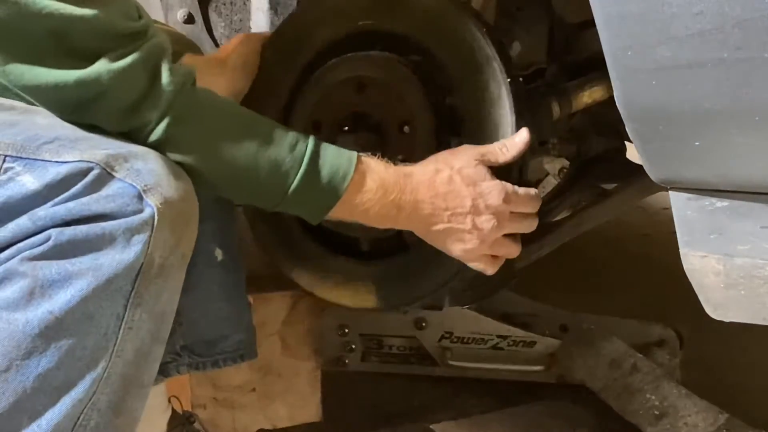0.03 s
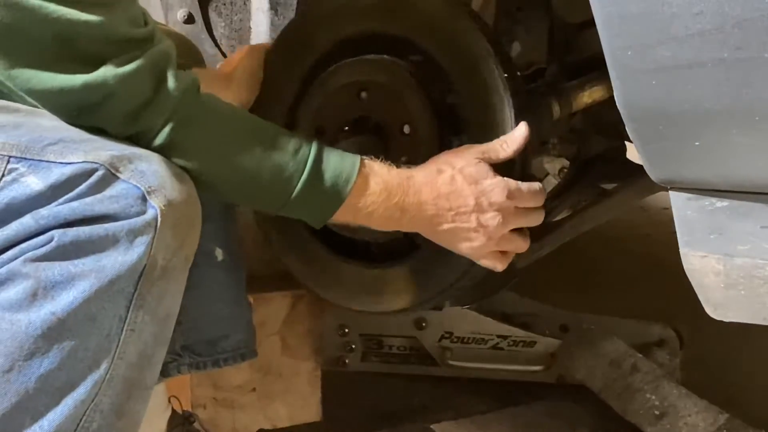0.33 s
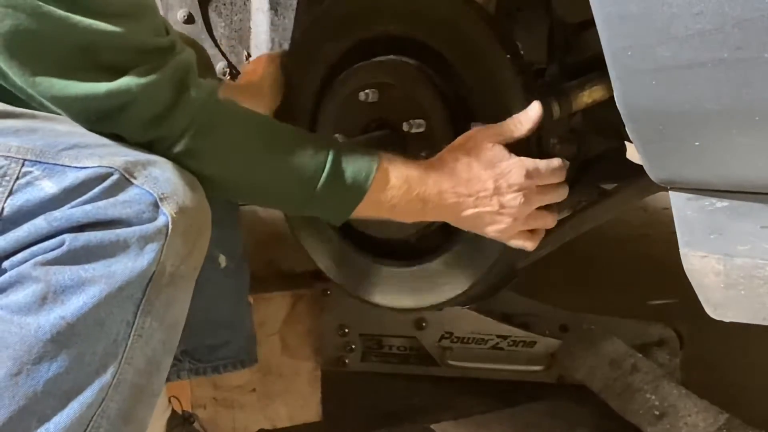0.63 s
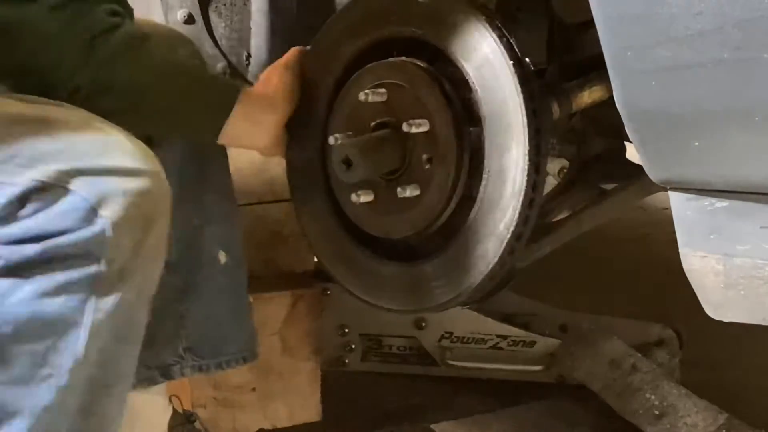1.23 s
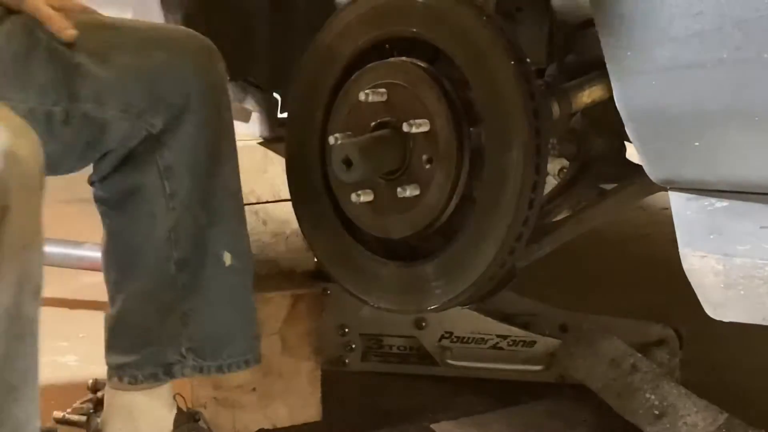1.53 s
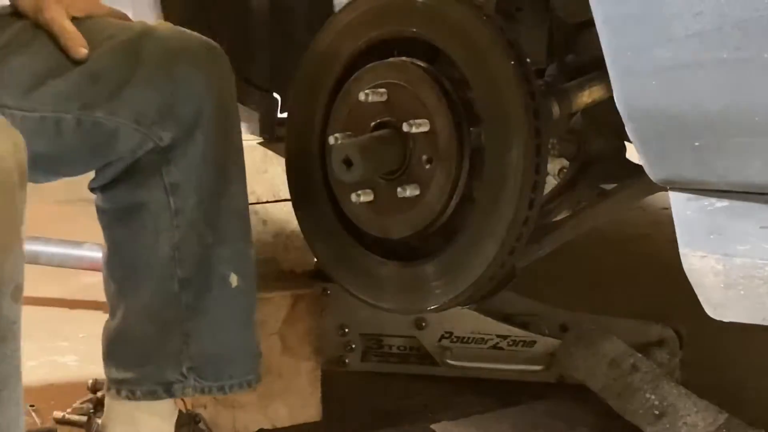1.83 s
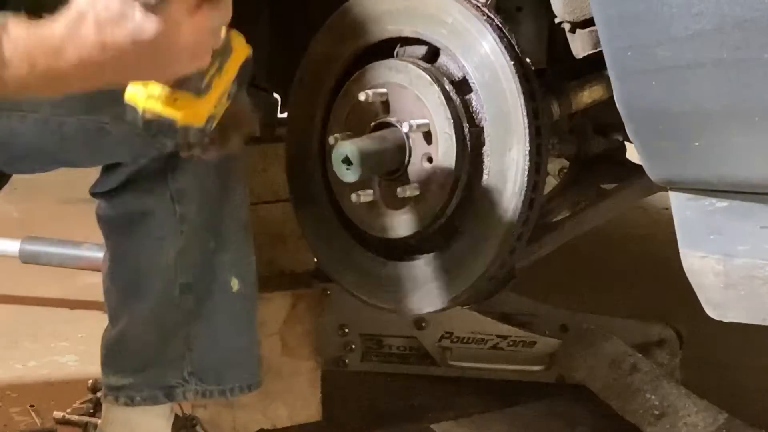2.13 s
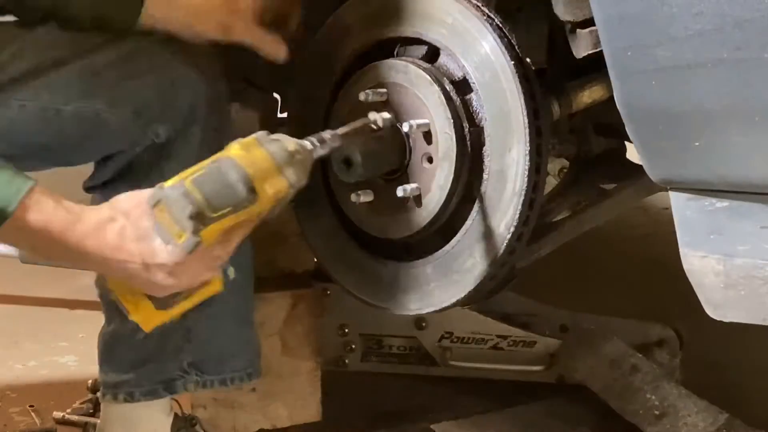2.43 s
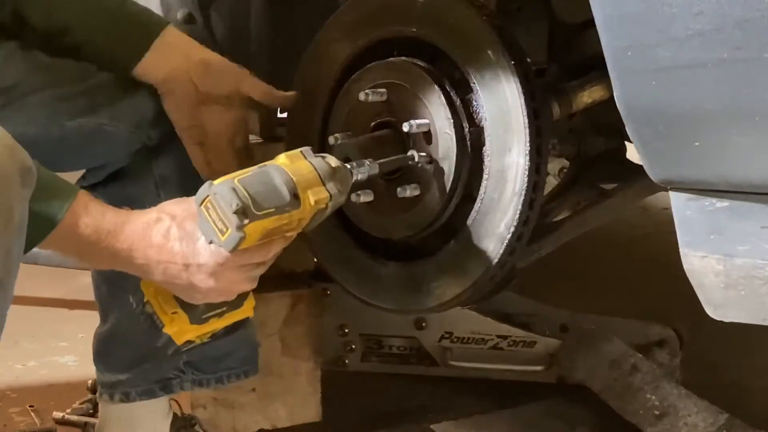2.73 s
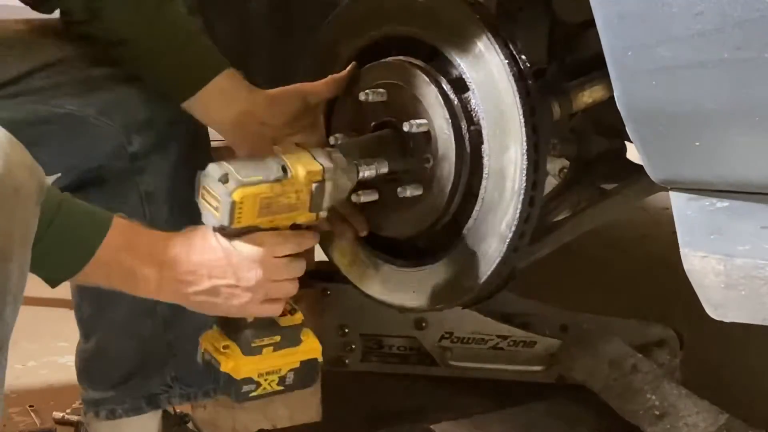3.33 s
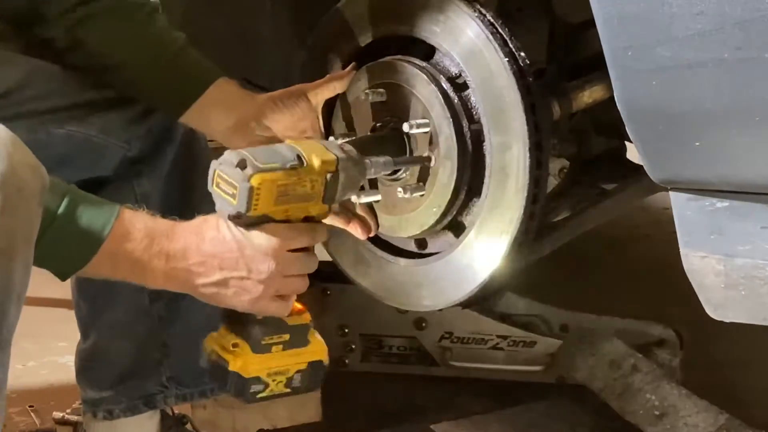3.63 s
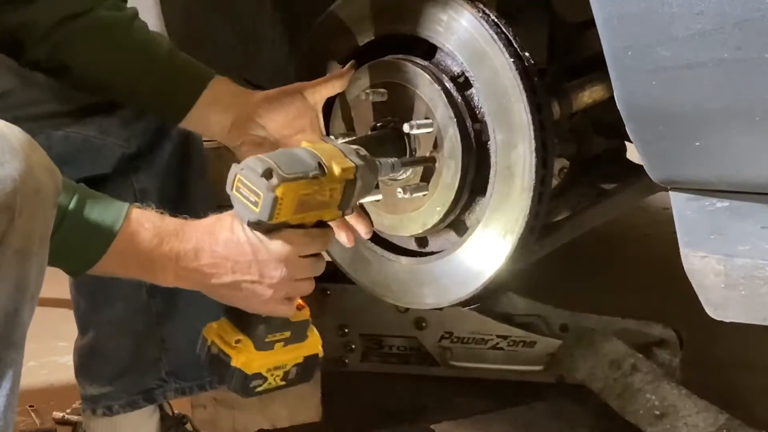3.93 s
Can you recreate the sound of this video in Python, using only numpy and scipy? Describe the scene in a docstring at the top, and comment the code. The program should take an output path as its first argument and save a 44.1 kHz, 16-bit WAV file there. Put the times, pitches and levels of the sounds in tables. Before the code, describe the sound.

Close up in a garage, a hand-turned brake disc scrapes with dull knocks. After a lull of faint cloth rustle and electrical hum, a steel socket clanks on and a cordless impact tool whirs briefly three times.

```python
"""A brake disc scrapes, rings and clacks as it is turned by hand, and the slack in the drive shaft clunks.
We are in a garage, with a stereo microphone close to the wheel arch. Clothes rustle, a socket clanks
onto the hub nut, and a cordless impact tool spins up in three short blips that knock the shaft round
again. A mains hum lies underneath, and the room adds a short tail."""
import sys
import numpy as np
from scipy import signal
from scipy.fft import rfft, irfft
from scipy.io import wavfile

SR = 44100
rng = np.random.default_rng(int(sys.argv[2]) if len(sys.argv) > 2 else 0)


def materialize(psi):
    """Save the field psi as 16-bit PCM at rate SR to the path in sys.argv[1].

    A 1-D psi becomes a single channel; in a 2-D psi each row is a channel.
    """
    bounded = np.clip(np.atleast_2d(psi).T, -1, 1)
    quanta = np.round(bounded * 32767).astype(np.int16)
    wavfile.write(sys.argv[1], SR, quanta)


N = 176400
T = np.arange(N) / SR

# Modes of the brake disc. Each row: frequency in Hz, relative level in dB, t60 in seconds.
DISC_MODES = [(1248.4, 1, 0.16), (1985, -7.5, 0.08), (2143, -10.5, 0.1), (2500, -7.5, 0.035),
              (3003, 8.5, 0.054), (3575, -7, 0.078), (3762, -2, 0.052), (4750, -3, 0.08),
              (6060, -1.5, 0.11), (7710, -7.5, 0.24), (10030, -18.5, 0.15), (11400, -14.5, 0.04),
              (12600, -5.5, 0.035)]
# Spectrum of rubbing cloth. Each row, as in every spectrum here: frequency in Hz, relative level in dB.
CLOTH_SPECTRUM = [(40, -37), (150, -2), (500, -4), (1600, 0.5), (3500, -0.5), (5500, -9.5), (8500, -5.5),
                  (14000, -22)]


def disc_scrapes():
    """The disc catches: a chattering rub rings it, most of all near the pitch of the contact."""
    # Each row: start in seconds, level in dB, decay in seconds, tilt in dB per octave, contact in Hz.
    catches = [(0.001, -45, 0.027, -2, 3000), (0.04, -44, 0.0086, 3, 3000),
               (0.108, -55.5, 0.031, 2.5, 5900), (0.122, -46, 0.01, 2, 3040),
               (0.301, -57.5, 0.024, 2, 3040), (0.384, -49, 0.032, 8, 1280), (0.422, -60, 0.038, -1, 1260),
               (0.498, -49.5, 0.0064, 2, 2100), (0.518, -50, 0.016, 0, 3760),
               (0.553, -42.5, 0.052, 4.5, 4700), (0.612, -46.5, 0.048, 6, 3750),
               (0.656, -28, 0.016, -2.5, 2200), (0.708, -35, 0.019, -0.5, 3760),
               (0.748, -44, 0.0067, -4, 2980), (0.938, -40, 0.017, -0.5, 6000)]
    # Spectrum of the grinding. Each row: Hz, dB.
    grind_spectrum = [(200, -80), (800, -9.5), (2000, -6), (4300, -8.5), (6500, -5.5), (8300, -6),
                      (10800, -19.5), (12200, -8.5), (15500, -43.5)]
    contact_db, contact_octaves = 9, .15

    def scrape(t, decay_s, tilt_db, contact_hz):
        envelope = swell(t, rise_s=decay_s / 10, decay_s=decay_s)
        rub = unit(rng.standard_normal(len(t)) * (.5 + chatter(len(t))))
        modes = [(hz, db + contact_db * np.exp(-(np.log2(hz / contact_hz) / contact_octaves) ** 2), t60)
                 for hz, db, t60 in DISC_MODES]
        ringing = excite(envelope * rub, ring(modes, t, tilt_db))
        grind = envelope * unit(shape(resound(rub, ring_s=.0025), grind_spectrum, tilt_db))
        return amp(-6) * grind + amp(2) * ringing
    return play(catches, scrape)


def disc_clacks():
    """Loose metal knocks home: a hard midrange crack and a little ring from the disc."""
    # Each row: start in seconds, level in dB, decay in seconds.
    knocks = [(0.017, -43.5, 0.0079), (0.9213, -25, 0.0087), (1.2015, -42, 0.0033), (1.2325, -34, 0.0028),
              (1.24, -44, 0.0082), (2.008, -51, 0.0045), (3.2372, -38.5, 0.01), (3.4118, -42, 0.024)]
    # Spectrum of the crack. Each row: Hz, dB.
    crack_spectrum = [(600, -32), (1200, -5.5), (3200, -1.5), (4800, -14.5), (7000, -22.5), (15000, -33.5)]

    def clack(t, decay_s):
        crack = unit(shape(rng.standard_normal(len(t)), crack_spectrum))
        crack *= swell(t, rise_s=.00013, decay_s=decay_s)
        return crack + amp(-5) * excite(crack, ring(DISC_MODES, t))
    return play(knocks, clack)


def shaft_clunks():
    """The slack is taken up with a dull knock; the car body and room boom and ring just after it."""
    # Each row: start in seconds, level in dB, tilt in dB per octave (also favours knock over boom).
    knocks = [(0.001, -42, -3), (0.041, -29.5, -3), (0.122, -36.5, -3), (0.325, -48.5, -10.5),
              (0.392, -37.5, -1.5), (0.422, -38.5, -2), (0.51, -42.5, -3), (0.556, -40.5, -0.5),
              (0.602, -34.5, -2), (0.712, -23.5, 0.5), (0.738, -50, 11.5), (0.945, -38.5, 3.5),
              (1.24, -51, 0), (3.035, -43, -3), (3.092, -35.5, -0.5), (3.18, -45, -4.5), (3.445, -41, -2.5),
              (3.616, -29, 0), (3.64, -35, -3.5), (3.781, -28.5, 2.5)]
    # Low ringing of the car body and room after each clunk. Each row: Hz, dB, t60 in seconds.
    body_modes = [(116, 1, .35), (166, 3, .35), (213, 10, .38), (323, 10, .42), (381, 7, .25),
                  (441, 8.5, .22), (624, 13, .14), (1263, 7, .2)]
    # Spectra of the knock and the boom. Each row: Hz, dB.
    knock_spectrum = [(30, -54), (100, -21), (250, -6.5), (400, -3.5), (700, 1), (1000, -10.5), (1400, -18),
                      (2500, -22.5), (6000, -40)]
    boom_spectrum = [(40, -51), (55, -21), (75, -17.5), (110, -2.5), (210, 0), (300, -5.5), (500, -13),
                     (1500, -86.5)]

    def clunk(t, tilt_db):
        knock = grit(len(t), knock_spectrum, rough_db=-2.5) * swell(t, rise_s=.0018, decay_s=.029)
        boom = grit(len(t), boom_spectrum, rough_db=.5) * swell(t, rise_s=.024, decay_s=.044)
        ringing = ring(body_modes, t, tilt_db) * (1 - np.exp(-t / .024))
        return amp(-4.5 + tilt_db) * knock + amp(-7 - tilt_db) * boom + amp(2.5) * ringing
    return play(knocks, clunk)


def socket_clanks():
    """Steel strikes the hub: a hard crack and the short ring of the socket."""
    # Each row: start in seconds, level in dB, decay in seconds, tilt in dB per octave, ring in dB.
    strikes = [(3.024, -49, 0.041, -2, -4), (3.042, -43, 0.055, -2.5, -1.5), (3.0785, -28.5, 0.011, -2, -1),
               (3.0955, -28, 0.005, -1.5, 7.5), (3.1845, -47, 0.0075, -7, -9),
               (3.2741, -43.5, 0.0036, -1.5, -1), (3.369, -54.5, 0.071, -13, -22),
               (3.4208, -43, 0.03, 2, -12), (3.4392, -17, 0.0085, -1.5, -23), (3.4428, -24.5, .007, 9, -9),
               (3.4578, -12.5, 0.0028, 8.5, -27), (3.462, -29.5, 0.01, -2.5, -18),
               (3.472, -39.5, 0.089, 7, -27)]
    # Modes of the socket. Each row: Hz, dB, t60 in seconds.
    socket_modes = [(1238, -4, .12), (2320, -1, .08), (3015, 2, .04), (3700, -2, .025), (4398, -3, .025),
                    (5378, 3, .055), (7041, -6, .04)]
    # Spectrum of the crack. Each row: Hz, dB.
    crack_spectrum = [(150, -26), (600, -18.5), (950, -14.5), (1400, -5), (2100, -5.5), (3400, 4),
                      (6000, 0.5), (8000, 1), (10500, -7), (14000, -7.5), (16000, -19)]

    def clank(t, decay_s, tilt_db, ring_db):
        crack = grit(len(t), crack_spectrum, rough_db=1, tilt_db=tilt_db)
        crack *= swell(t, rise_s=.00062, decay_s=decay_s)
        ringing = ring(socket_modes, t, tilt_db / 2) * (1 - np.exp(-t / .00017))
        return crack + amp(ring_db) * ringing
    return play(strikes, clank)


def impact_tool():
    """Each pull spins the motor up until the brake stops it: gears rattle and whine, metal rings on."""
    # Each row: start and length in seconds, target turns per second, relative dB of gears, whine, ring.
    pulls = [(3.586, .04, 445, -28.5, -41, -37), (3.701, .07, 390, -31.5, -39, -38),
             (3.909, .04, 255, -34, -47, -40)]
    # Whine of motor and gears. Each row: multiple of the shaft speed, level in dB.
    whine_partials = [(5, -11), (8, -9), (11, -12), (14, -6), (20, 0), (22, -8)]
    # Modes of the tool's metal. Each row: Hz, dB, t60 in seconds.
    tool_modes = [(4450, -10, .04), (5375, -7, .06), (7300, -2, .09), (7470, -1, .15), (7615, -1, .28),
                  (7760, 0, .12)]
    # Spectra of the gear noise and the housing's resonances. Each row: Hz, dB.
    gear_spectrum = [(900, -14.5), (1700, -2), (3300, 2.5), (4800, 2.5), (6500, -2.5), (7900, 3.5),
                     (9500, 0.5), (11200, -9), (14300, -1), (16000, -17)]
    housing_spectrum = [(1500, -6), (3050, 0), (3900, -5), (5350, 0), (6800, -8), (7400, 10), (7750, 13),
                        (8200, -2)]
    spin_up_s, brake_s, gear_rise_s, gear_fall_s, housing_ring_s = .017, .036, .014, .016, .0016
    coast_db = -7  # the rattle eases as the motor reaches speed
    shaft_hz, load, whine_level, jolt = np.zeros((4, N))
    for start, length, top_hz, gear_db, whine_db, ring_db in pulls:
        since_pull, since_release = np.maximum(T - start, 0), np.maximum(T - start - length, 0)
        speed = (1 - np.exp(-since_pull / spin_up_s)) * np.maximum(1 - (since_release / brake_s) ** 2, 0)
        fade = np.exp(-since_release / gear_fall_s)
        driven = (1 - np.exp(-(since_pull / gear_rise_s) ** 2)) * fade
        shaft_hz += top_hz * speed
        load += amp(gear_db + coast_db * speed ** 2) * driven
        whine_level += amp(whine_db) * speed * driven
        jolt += amp(ring_db + coast_db * speed) * (since_pull > 0) * fade
    angle = phase(shaft_hz * (1 + .007 * walk(400)))
    teeth = amp(-2) * gear_mesh(angle) * np.sqrt(shaft_hz / shaft_hz.max())
    rasp = amp(-3) * rng.standard_normal(N)
    force = load * (teeth + rasp) * unit(.5 + chatter(N))
    gears = unit(shape(resound(force, housing_ring_s), gear_spectrum)) * np.std(force)
    tones = whine_level * sum(amp(db + 2 * walk(300)) * np.sin(k * angle) for k, db in whine_partials)
    # The whine flares as it sweeps through the housing's resonances.
    whine = shape(tones + resound(tones, housing_ring_s), housing_spectrum)
    ringing = excite(jolt * rng.standard_normal(N), ring(tool_modes, T[:SR]))
    return gears + whine + ringing


def gear_mesh(angle, count=38):
    """Gear teeth give the same rough pattern on every turn of the shaft."""
    return sum(np.sin(k * angle + 2 * np.pi * rng.random()) for k in range(1, count)) / np.sqrt(count / 2)


def handling_ticks():
    """Handling makes short dry scuffs."""
    # Each row: start in seconds, level in dB, decay in seconds, tilt in dB per octave.
    scuffs = [(1.134, -53, 0.04, 1), (1.222, -44, 0.023, -3.5), (1.632, -55.5, 0.0028, 12.5),
              (1.8686, -52.5, 0.0046, 16.5), (2.0065, -52.5, 0.014, 6.5), (2.028, -49.5, 0.021, -4.5),
              (2.285, -53.5, 0.016, 5), (2.311, -58, 0.0067, 2.5), (2.648, -64.5, 0.026, 1)]

    def tick(t, decay_s, tilt_db):
        scuff = grit(len(t), CLOTH_SPECTRUM, rough_db=3, tilt_db=tilt_db)
        return scuff * swell(t, rise_s=.0035, decay_s=decay_s)
    return play(scuffs, tick)


def clothes():
    """Cloth rubs near the microphone with a wandering brightness; one sleeve gives a falling swish."""
    # Sliding cloth. Each row: time in seconds, dull rub in dB, bright hiss in dB.
    rustle = [(0.9, -55.5, -142), (0.98, -58.5, -58.5), (1.11, -71, -79), (1.17, -52.5, -51.5),
              (1.22, -51, -64), (1.27, -51.5, -74), (1.39, -71.5, -77), (1.5, -66.5, -65),
              (1.59, -78.5, -75.5), (1.69, -73, -55.5), (1.77, -84, -84), (1.86, -78.5, -81),
              (1.9, -68, -63), (2.06, -64.5, -72), (2.24, -69.5, -70), (2.3, -61, -65), (2.36, -84, -83),
              (2.39, -65, -60.5), (2.5, -77, -105), (2.92, -83, -78.5), (3.1, -56.5, -68), (3.21, -54, -60),
              (3.34, -64, -91)]
    # The passing sleeve. Each row: time in seconds, level in dB, centre in Hz.
    sleeve = [(1.87, -82, 2013), (1.91, -59.5, 1834), (1.96, -54.5, 1694), (2.02, -59.5, 1563),
              (2.2, -78, 1546)]
    # Spectrum of the hiss. Each row: Hz, dB.
    hiss_spectrum = [(800, -41), (3000, -15), (5500, -14), (8000, -5.5), (11000, -11), (14000, -9),
                     (16000, -8)]
    rub = grit(N, CLOTH_SPECTRUM, rough_db=2) * amp(curve(rustle) + 2.4 * walk(60))
    hiss = grit(N, hiss_spectrum, rough_db=4) * amp(curve(rustle, column=2))
    band = unit(shape(rng.standard_normal(N), [(100, 8), (250, -2), (700, -6), (3000, -29)]))
    swish = unit(band * np.sin(phase(curve(sleeve, column=2)))) * amp(curve(sleeve))
    return (rub + hiss) * (T > rustle[0][0]) + swish * (T > sleeve[0][0]) * (T < sleeve[-1][0])


def room_tone():
    """A slightly wavering mains hum over the quiet air of the garage."""
    # Each row: multiple of hum_hz, relative level in dB.
    hum_partials = [(1, -26), (2, -0.5), (4, -22.5)]
    # Spectrum of the air. Each row: Hz, dB.
    air_spectrum = [(25, -67), (105, -10), (180, -13), (212, -18), (242, -2), (344, -23.5), (476, -22),
                    (591, -27.5), (1440, -35), (1940, -37), (14000, -60), (16000, -37.5)]
    hum_hz = 120.54
    angle = phase(hum_hz * (1 + .0025 * walk(8.45)))
    hum = unit(sum(amp(db) * np.sin(k * angle) for k, db in hum_partials))
    hum *= amp(-57 + .6 * walk(9.6))
    return hum + amp(-64.5) * unit(shape(rng.standard_normal(N), air_spectrum))


def wheel_arch(x):
    """Close reflections smear the phase and keep the spectrum."""
    t, lead = T[:SR // 20], SR // 200
    echoes = rfft(rng.standard_normal(len(t)) * swell(t, rise_s=.00051, decay_s=.00089))
    all_pass = np.roll(irfft(echoes / np.abs(echoes), len(t)), lead)
    return signal.fftconvolve(x, all_pass)[lead:N + lead]


def garage(x, low_t60_s=.5, high_t60_s=.39):
    """The walls return a diffuse tail whose treble dies first."""
    t = T[:SR // 2]
    noise = rng.standard_normal(len(t))
    low = signal.sosfilt(signal.butter(2, 2500, fs=SR, output="sos"), noise)
    tail = low * amp(-60 * t / low_t60_s) + (noise - low) * amp(-60 * t / high_t60_s)
    tail *= 1 - np.exp(-t / .0009)
    return amp(-15) * signal.fftconvolve(x, tail / np.linalg.norm(tail))[:N]


def amp(db):
    return 10 ** (np.asarray(db) / 20)


def unit(x):
    return x / np.sqrt(np.mean(x ** 2))


def phase(hz):
    return 2 * np.pi * np.cumsum(hz) / SR


def curve(rows, column=1):
    """One column of a table joined by straight lines in time."""
    rows = np.array(rows)
    return np.interp(T, rows[:, 0], rows[:, column])


def shape(x, spectrum, tilt_db=0, pivot_hz=3000):
    """Filter by a spectrum, tilted for two octaves either side of a pivot."""
    octave = np.log2(np.maximum(np.fft.rfftfreq(len(x), 1 / SR), 20))
    hz, db = np.array(spectrum).T
    gain_db = np.interp(octave, np.log2(hz), db) + tilt_db * np.clip(octave - np.log2(pivot_hz), -2, 2)
    return irfft(rfft(x) * amp(gain_db), len(x))


def grit(size, spectrum, rough_db, tilt_db=0):
    """Dense tiny clicks of uneven strength, coloured by a spectrum, rms 1."""
    noise = rng.standard_normal(size)
    unevenness = np.repeat(rng.standard_normal(size // 32 + 1), 32)[:size]
    return unit(shape(noise * amp(rough_db * unevenness), spectrum, tilt_db))


def chatter(size, knocks_per_s=330, decay_s=.0011):
    """Strength of loose parts knocking at uneven moments, rms 1."""
    knocks = (rng.random(size) < knocks_per_s / SR) * (.5 + rng.random(size))
    energy = signal.lfilter([1], [1, -np.exp(-2 / decay_s / SR)], knocks ** 2)
    return unit(np.sqrt(energy + .02))


def walk(points_per_s):
    """Random drift with a spread near 1; it holds still after 1024 points."""
    return np.interp(T * points_per_s, np.arange(1024), rng.standard_normal(1024))


def swell(t, rise_s, decay_s):
    """Attack and exponential decay, peak 1."""
    envelope = (1 - np.exp(-t / rise_s)) * np.exp(-t / decay_s)
    return envelope / envelope.max()


def ring(modes, t, tilt_db=0, split=.007):
    """Free ringing of an object's modes, each a beating pair, starting near rms 1."""
    hz, db, t60 = np.repeat(np.array(modes), 2, axis=0).T[:, :, None]
    hz = hz * (1 + split * rng.uniform(-.88, 1, hz.shape))
    gain = amp(db + tilt_db * np.log2(hz / hz[0]))
    waves = gain * amp(-60 * t / t60) * np.sin(2 * np.pi * (hz * t + rng.random(hz.shape)))
    return waves.sum(0) / np.sqrt(np.sum(gain ** 2) / 2)


def excite(force, response):
    """Drive a resonator; the result keeps the energy of the force."""
    y = signal.fftconvolve(force, response)[:len(force)]
    return y * np.sqrt(np.sum(force ** 2) / np.sum(y ** 2))


def resound(x, ring_s):
    """A thicket of short resonances, different for every contact."""
    t = T[:SR // 20]
    return excite(x, rng.standard_normal(len(t)) * np.exp(-t / ring_s))


def play(rows, sound):
    """Sound each row of an event table at its time and level."""
    track, t = np.zeros(2 * N), T[:SR // 2]
    for start, db, *settings in rows:
        i = int(start * SR)
        track[i:i + len(t)] += amp(db) * sound(t, *settings)
    return track[:N]


def scene():
    """Wheel arch and garage spread the close sounds; the microphone's left port hears them first."""
    # Stereo width. Each row: frequency in Hz, gain of the side signal in dB.
    width = [(60, 9.5), (200, -37), (400, -19), (1300, -10), (5000, 1), (15000, -7.5)]
    # Each row: frequency in Hz, radians by which the left port leads.
    port_lead = [(0, 0.124), (1000, 0.68), (4400, 0.82), (6500, 1.93), (11500, 2.04), (13600, -0.1)]
    near = disc_scrapes() + shaft_clunks() + socket_clanks() + disc_clacks()
    near += handling_ticks() + clothes() + amp(5) * impact_tool()
    floor = room_tone()
    mid = near + garage(near) + floor
    side = shape(amp(-6) * wheel_arch(near + floor) + amp(6) * garage(near), width)
    lag = np.interp(np.fft.rfftfreq(N, 1 / SR), *np.array(port_lead).T)
    right = irfft(rfft(mid - side) * np.exp(-1j * lag), N)
    return np.array([amp(-1.9) * (mid + side), amp(-2.5) * right])


def record(dry, top_hz=16100):
    """The recorder cuts the top."""
    return signal.sosfilt(signal.ellip(10, .2, 80, top_hz, fs=SR, output="sos"), dry)


dry = scene()
out = record(dry)
materialize(out)
```